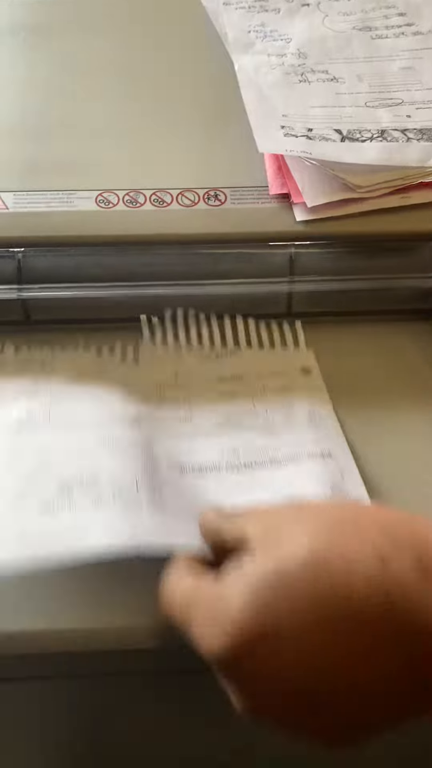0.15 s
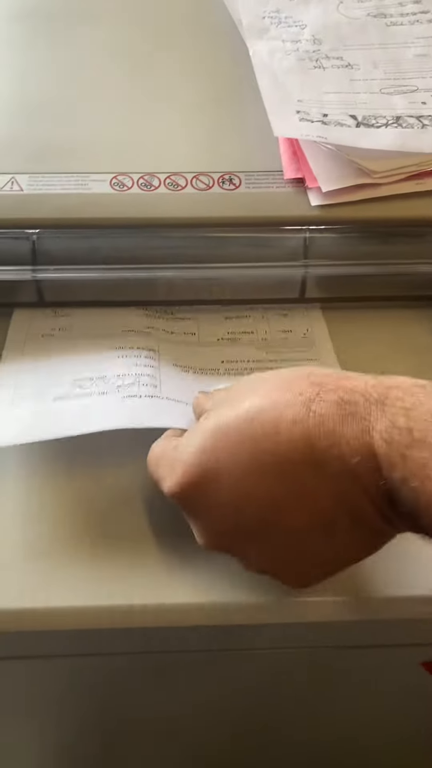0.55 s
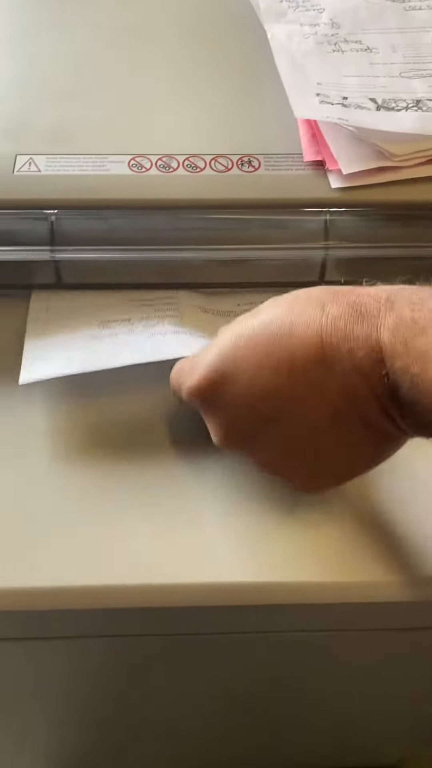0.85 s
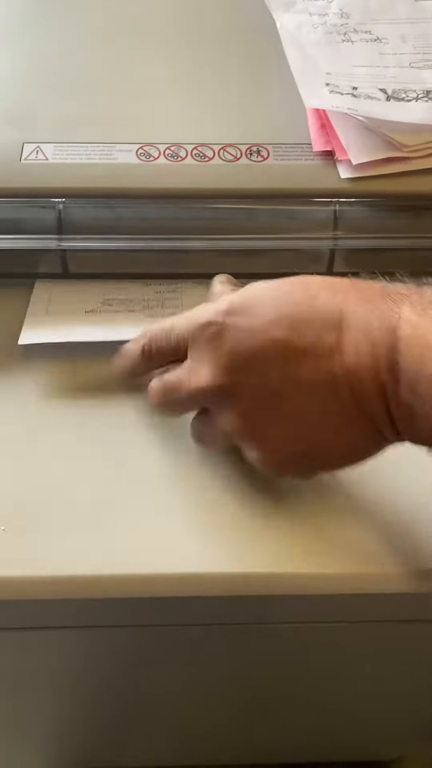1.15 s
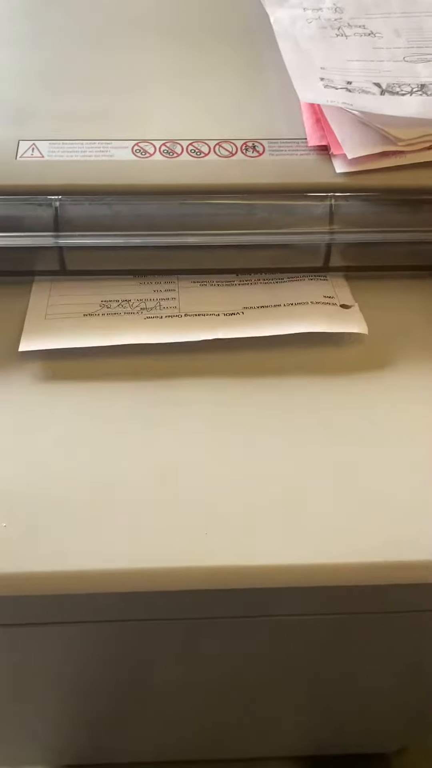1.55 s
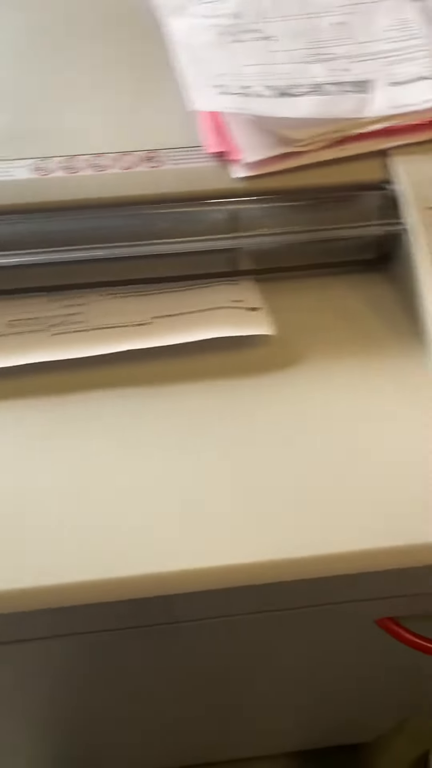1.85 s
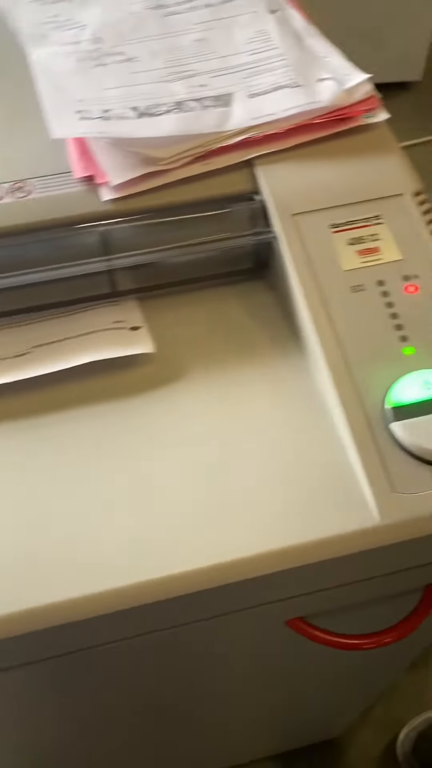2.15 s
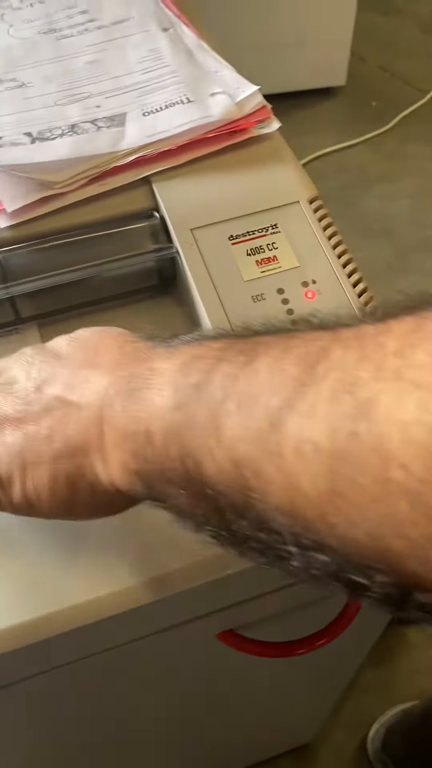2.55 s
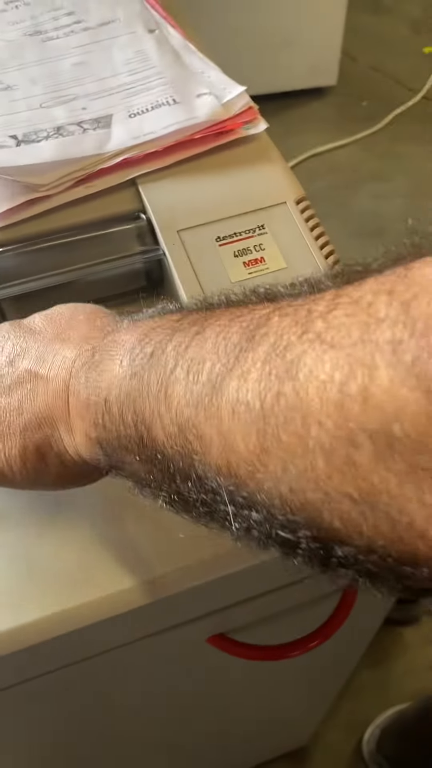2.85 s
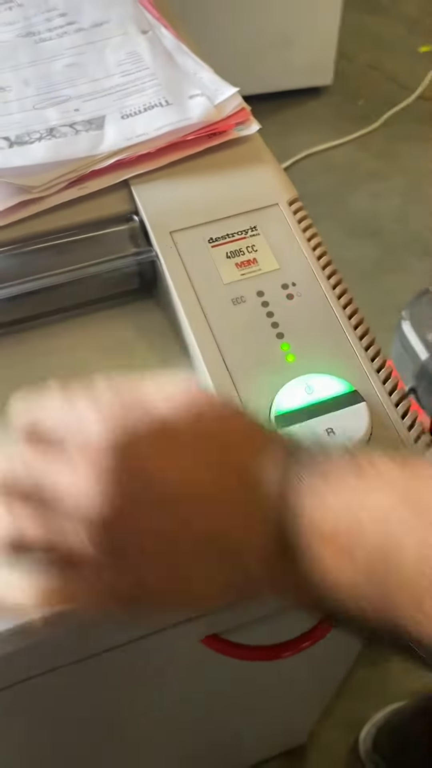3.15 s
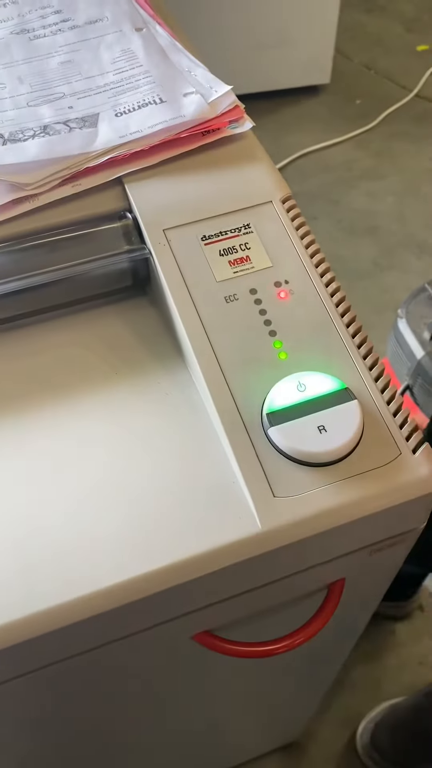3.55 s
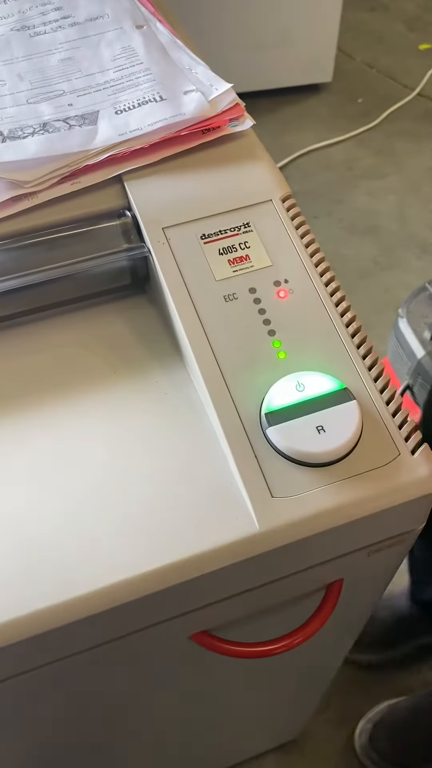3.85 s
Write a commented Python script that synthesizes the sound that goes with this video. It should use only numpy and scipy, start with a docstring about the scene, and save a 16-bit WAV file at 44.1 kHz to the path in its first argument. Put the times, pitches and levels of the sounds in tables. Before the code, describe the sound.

A paper shredder takes a rustling sheet, thumps into motion, hums and chews it with sharp crackling

```python
"""An office shredder starts up and chews a sheet of paper, held close to a hand-held microphone in a small room.
First the sheet hisses, crinkles and drums over the steel top into the slot: coloured random grains and noise.
A switch trips and the cabinet thumps (decaying modes); the motor settles to a mains hum with a gear whine.
A second later the cutters catch the sheet: tearing fibres crackle in bursts, with sharp snaps between.
Reflections come from under the lid and from the room; two microphone ports give the stereo."""
import sys
import numpy as np
from scipy import signal
from scipy.fft import rfft, irfft
from scipy.io import wavfile
from scipy.ndimage import uniform_filter1d

SR = 44100
rng = np.random.default_rng(int(sys.argv[2]) if len(sys.argv) > 2 else 0)


def digitize_waveform(pressure):
    """Quantize a signal to 16-bit integers and store it at the path in sys.argv[1].

    Rows of a 2-D input are taken as channels; values are limited to [-1, 1].
    """
    field = np.atleast_2d(pressure).T
    bounded = np.clip(field, -1, 1)
    quanta = np.round(bounded * 32767).astype(np.int16)
    wavfile.write(sys.argv[1], SR, quanta)


N = 176400
T = np.arange(N) / SR  # seconds


def amp(db):
    """Decibels to gain."""
    return 10 ** (np.asarray(db) / 20)


def unit(x):
    """Scales to rms 1."""
    return x / np.sqrt(np.mean(x ** 2) + 1e-20)


def read(points, hz):
    """Reads a table of (pitch_hz, value) on a log-frequency axis."""
    f, value = np.transpose(points)
    return np.interp(np.log(hz + 1), np.log(f + 1), value)


def level(points):
    """Gain along a (start_s, level_db) curve, practically silent outside it."""
    return amp(np.interp(T, *np.transpose(points), left=-150, right=-150))


def ramp(start, length):
    """Rises from 0 to 1 over length seconds."""
    return np.clip((T - start) / length, 0, 1)


def add(mix, s, sound):
    """Adds a sound at time s, cut off at the end of the mix."""
    part = mix[max(round(s * SR), 0):][:len(sound)]
    part += sound[:len(part)]


def colour(x, points, size=4096):
    """Causal minimum-phase filter of unit energy, so only the shape of the spectrum counts."""
    hz = abs(np.fft.fftfreq(size, 1 / SR))
    log_gain = np.log(amp(read(points, hz)))
    spectrum = np.exp(np.conj(signal.hilbert(log_gain)))
    taps = np.fft.ifft(spectrum).real[:size // 2]
    return signal.oaconvolve(x, taps / np.linalg.norm(taps))[:N]


def drift(rate_hz):
    """Slow random motion of rms 1: noise rolled off steeply above rate_hz."""
    hz = np.fft.rfftfreq(N, 1 / SR)
    slow = rfft(rng.standard_normal(N)) / (1 + (hz / rate_hz) ** 4)
    return unit(irfft(slow, N))


def grains(per_s, spread_db, top=3.36):
    """Random clicks of either sign, mostly small, a few large; rms 1."""
    size = amp(spread_db * np.minimum(rng.exponential(1, N), top))
    sign = rng.choice([-1, 1], N)
    present = rng.random(N) < per_s / SR
    return unit(size * sign * present)


def ring(modes, t):
    """Decaying sine modes after a blow."""
    return sum(amp(db - 60 * t / t60) * np.sin(2 * np.pi * hz * t) for hz, db, t60 in modes)


# loudness of the sliding sheet: start_s, level_db
SLIDE = [(0, -49), (.13, -48), (.19, -44), (.235, -45), (.27, -49), (.31, -51), (.35, -63), (.4, -63),
         (.455, -71), (.5, -59), (.525, -53), (.62, -49), (.68, -51), (.8, -60), (.93, -55), (1.015, -63),
         (1.04, -53), (1.078, -54), (1.1, -71), (1.15, -85)]
# spectrum of the paper hiss: pitch_hz, level_db (per Hz)
SLIDE_COLOUR = [(100, -56), (500, -27), (1100, 1.5), (1250, -4), (1480, -3), (1750, 1), (2150, 3.5),
                (4000, 0), (5500, -0.5), (8000, -8), (12000, -3.5), (16000, -27)]
CRINKLES_PER_S, CRINKLE_DB = 160, -7


def sliding_sheet():
    """Paper rubs on the tray: dense fluttering friction grains with sparser, more uneven crinkles."""
    friction = grains(7000, 2.4) * amp(1.7 * drift(45))
    crinkles = amp(CRINKLE_DB) * grains(CRINKLES_PER_S, 5.5)
    return unit(colour(friction + crinkles, SLIDE_COLOUR)) * level(SLIDE)


# loudness of the soft drumming as the sheet is pushed: start_s, level_db (before its swing)
DRUM = [(0, -65), (.2, -54), (.42, -66), (.55, -57.5), (.68, -51), (.82, -53.5), (.95, -51.5), (1.08, -48),
        (1.14, -54)]
# spectrum of the hollow tray: pitch_hz, level_db (per Hz)
DRUM_COLOUR = [(60, -27), (150, 2), (230, -1.5), (400, -7), (600, -12.5), (1500, -15.5), (6000, -60)]
DRUM_SWING_DB = 2.2  # rms


def drumming_tray():
    """The hollow tray drums under the pushed sheet: low noise with a restless level."""
    noise = colour(rng.standard_normal(N), DRUM_COLOUR)
    return noise * level(DRUM) * amp(DRUM_SWING_DB * drift(26))


# spectrum of the room background: pitch_hz, level_db (per Hz)
ROOM_COLOUR = [(20, -15), (55, 8), (90, 3.5), (140, -1), (250, -9.5), (430, -22.5), (650, -16.5),
               (1000, -22), (1700, -31.5), (2600, -31), (4000, -39.5), (8000, -48.5), (16000, -60)]
ROOM_DB = -49.5  # before a slow swing


def background():
    """Quiet, mostly low room noise whose level wanders slowly."""
    noise = colour(rng.standard_normal(N), ROOM_COLOUR)
    return amp(ROOM_DB) * noise * amp(1.6 * drift(3.3))


WET_DB, ROOM_T60_S = -13, 0.075


def room(x, t60, delay):
    """A diffuse decaying tail after a delay in seconds, different at each port and weak in the bass."""
    t = T[:SR // 2]
    tail = rng.standard_normal((2, len(t))) * amp(-60 * t / t60) * (t > delay)
    tail = signal.sosfilt(signal.butter(1, 1200, "high", fs=SR, output="sos"), tail)
    tail /= np.linalg.norm(tail, axis=1, keepdims=True)
    return signal.fftconvolve(x[None], tail, axes=1)[:, :N]


NEAR_T60_S, NEAR_DB = .02, -6.5


def lid(x, count=5, size=64):
    """Sound hops between places along the wide slot, each with its own reflections under the lid."""
    place = np.repeat(rng.integers(0, count, N // size + 1), size)[:N]
    shares = [uniform_filter1d((place == k) * 1., size) for k in range(count)]
    return sum(room(x * share, NEAR_T60_S, .0004) for share in shares)


# the sheet's edge knocks on the feed tray:
# start_s, level_db, pitch_hz (ring), width_hz (ring), length_s (time to fall 30 dB)
TAPS = [(.144, -32.5, 1550, 199, 0.046), (.19, -36, 1700, 900, 0.042), (.668, -41, 1030, 500, 0.061),
        (.91, -42.5, 1200, 600, 0.05), (1.036, -41, 1110, 800, 0.081), (1.485, -44, 2280, 940, 0.029)]
TAP_DRY, TAP_RISE_S = 0.21, 0.0054  # share of unresonant scuff, rise time


def knocks(rows):
    """Short noise scuffs, each ringing in one broad resonance."""
    out, t = np.zeros(N), T[:SR // 4]
    for s, db, hz, width, length in rows:
        scuff = rng.standard_normal(len(t))
        r = np.exp(-np.pi * width / SR)  # pole radius from the ring width
        body = signal.lfilter([1], [1, -2 * r * np.cos(2 * np.pi * hz / SR), r * r], scuff)
        envelope = amp(db - 30 * t / length) * np.minimum(t / TAP_RISE_S, 1)
        add(out, s, envelope * (unit(body) + TAP_DRY * scuff))
    return out


# air resonances of the feed slot: pitch_hz, level_db (before SLOT_DB), t60_s
SLOT = [(1260, -9, .045), (2128, 11, 0.075), (2536, 6.5, 0.1), (2765, 0.5, 0.064), (2894, -1, .05),
        (4800, -9, .025)]
SLOT_DB = -43.5


def slot(x):
    """The air in the feed slot rings along."""
    return amp(SLOT_DB) * signal.oaconvolve(x, ring(SLOT, T[:SR // 10]))[:N]


# snaps of the sheet, faint as it is fed in, loud between the cutters:
# start_s, crack_db, treble_db (both before SNAP_DB)
SNAPS = [(.144, -33, -42), (2.887, -31, -38), (3.063, -21, -28), (3.098, -21, -27), (3.198, -27, -27),
         (3.236, -23, -36), (3.294, -20, -26), (3.472, -14, -24), (3.527, -20, -30), (3.546, -21, -36),
         (3.593, -25, -28), (3.636, -23, -35), (3.681, -22, -36), (3.835, -21, -25)]
# spectrum of the crack: pitch_hz, level_db (per Hz, before the random tint)
SNAP_COLOUR = [(300, -20), (1200, -10.5), (1600, -8), (2100, 0), (2850, 7), (3700, 1), (5200, -0.5),
               (6500, -2), (8000, -25), (16000, -37)]
# spectrum of its treble: pitch_hz, level_db (per Hz, before the random tint)
SNAP_TREBLE = [(300, -40), (5000, -28), (7500, -5.5), (11500, 3), (13000, -8), (16000, -15.5)]
SNAP_DB, SNAP_TINT_DB = -1.0, 2.5  # trim, rms of the random tint
# decay constant, rise, and the length over which the level is reckoned
SNAP_DECAY_S, SNAP_RISE_S, SNAP_LENGTH_S = .0011, .0005, .005


def snaps():
    """Single sharp cracks of the sheet: very short noise bursts, each with a tint of its own."""
    out, t = np.zeros(N), T[:SR // 50]
    shape = np.minimum(t / SNAP_RISE_S, 1) * np.exp(-t / SNAP_DECAY_S)
    for s, crack_db, treble_db in SNAPS:
        for db, points in ((crack_db, SNAP_COLOUR), (treble_db, SNAP_TREBLE)):
            tinted = [(hz, value + SNAP_TINT_DB * rng.standard_normal()) for hz, value in points]
            burst = colour(shape * rng.standard_normal(len(t)), tinted)
            burst *= np.sqrt(SNAP_LENGTH_S * SR) / np.linalg.norm(burst)
            add(out, s, amp(db + SNAP_DB) * burst)
    return out + 0.26 * slot(out)


# blows on the cabinet from switch, contactor and drive:
# start_s, boom_db, clank_db, rattle_db (boom and clank add to the mode levels)
BLOWS = [(1.496, -42.5, -51, -72), (1.512, -39, -57, -56.5), (1.695, -39, -45, -45.5),
         (1.714, -36, -42, -72), (1.744, -29, -24.5, -37), (1.753, -29.5, -12, -23.5),
         (1.763, -19, -27, -37), (1.779, -28, -36, -41), (1.834, -30, -32, -59), (1.873, -37, -36, -55),
         (1.907, -30, -30.5, -58)]
# panel modes: pitch_hz, level_db (relative), t60_s
BOOM = [(191, 12, 0.096), (224.7, 4, 0.15), (258, 5, 0.09)]
# frame modes: pitch_hz, level_db (relative), t60_s
CLANK = [(398, -15, 0.33), (460, 1, 0.068), (505, -12, 0.045), (680, -12.5, 0.16), (800, -15, 0.09),
         (970, -22, 0.095), (1320, -22, 0.061), (2297, -17, 0.044)]
# spectrum of the loose parts: pitch_hz, level_db (per Hz)
RATTLE_COLOUR = [(100, -10), (600, 11.5), (1100, -2.5), (1600, 1.5), (2400, -4.5), (3300, -19), (5500, -13),
                 (9000, -21), (16000, -27)]
BOOM_RISE_S, CLANK_RISE_S, RATTLE_S = 0.0068, 0.0019, 0.024  # RATTLE_S is a decay constant


def cabinet():
    """Each blow booms in the panels, clanks in the frame and rattles loose parts."""
    out, rattle, t = np.zeros(N), np.zeros(N), T[:SR // 2]
    boom = np.minimum(t / BOOM_RISE_S, 1) * ring(BOOM, t)
    clank = np.minimum(t / CLANK_RISE_S, 1) * ring(CLANK, t)
    for s, boom_db, clank_db, rattle_db in BLOWS:
        add(out, s, amp(boom_db) * boom + amp(clank_db) * clank)
        add(rattle, s, amp(rattle_db) * np.exp(-t / RATTLE_S) * rng.standard_normal(len(t)))
    return out + colour(rattle, RATTLE_COLOUR)


# modes of the starting switch: pitch_hz, level_db, t60_s
SWITCH = [(1514, -37.5, 0.037)]
SWITCH_S = 1.694


def switch():
    """One small bright click: a ringing mode."""
    out = np.zeros(N)
    add(out, SWITCH_S, ring(SWITCH, T[:SR // 5]))
    return out


START_S, SPIN_UP_S = 1.76, 0.02  # motor start, time constant of the shaft speed
LOAD_S, LOAD_RISE_S = 2.64, 0.25  # the load comes on
SHAFT_HZ = 29.75  # at full speed
HUM_HZ, HUM_LAG_TURNS = 120, .58


def shaft_turns():
    """Time in seconds of full-speed running: the integral of a speed that settles at 1."""
    speed = 1 - np.exp(-np.maximum(T - START_S, 0) / SPIN_UP_S)
    return np.cumsum(speed) / SR


def partial(k, waver):
    """One wavering multiple of the hum; the cabinet delays the higher ones more."""
    flutter = 1 + waver * (drift(10.4) + 1j * drift(7.9))
    return (flutter * np.exp(2j * np.pi * (k * HUM_HZ * T - HUM_LAG_TURNS * k * k))).real


# multiples of the magnetic hum: multiple, idle_db, loaded_db (both rms), waver_share
HUM = [(1, -22.5, -24, 0.037), (3, -32.5, -37, 0.036), (4, -46.5, -50, 0.33), (6, -49.5, -50, 0.26)]
# the octave of the hum as it swells: start_s, level_db (rms)
OCTAVE = [(1.87, -34), (2.56, -31.5), (4.0, -31)]
OCTAVE_WAVER, HUM_START_S, HUM_RISE_S = 0.31, 1.87, 0.06


def mains_hum(load):
    """Magnetic hum: steady multiples of one pitch whose levels move with the load."""
    hum = level(OCTAVE) * partial(2, OCTAVE_WAVER)
    for k, idle_db, loaded_db, waver in HUM:
        hum += amp(idle_db + (loaded_db - idle_db) * load) * partial(k, waver)
    return np.sqrt(2) * hum * ramp(HUM_START_S, HUM_RISE_S)


# tones of shaft and gears: pitch_hz (full speed), level_db (rms), wobble_rad (with each shaft turn)
WHINE = [(773.7, -35.5, 0.27), (862, -54, 0.3), (888, -56.5, 0), (1015, -53.5, 0), (1451, -54.5, 0.66)]
WHINE_WAVER_DB = 1.2  # rms


def gear_whine(turns):
    """Gear tones that rise with the shaft, their phase wobbling once a turn."""
    whine = np.zeros(N)
    for hz, db, wobble in WHINE:
        phase = 2 * np.pi * (hz * turns + rng.random())
        phase += wobble * np.sin(2 * np.pi * SHAFT_HZ * turns) + 0.17 * drift(28)
        whine += amp(db + WHINE_WAVER_DB * drift(43)) * np.cos(phase)
    return np.sqrt(2) * whine * ramp(START_S + 0.053, 0.033)


# spectrum of the running drive: pitch_hz, level_db (per Hz)
DRIVE_COLOUR = [(25, -30), (40, -15), (56, 2.5), (80, -6), (130, -0.5), (205, 5.5), (250, -0.5),
                (300, -5.5), (420, -8), (600, -12), (780, -7.5), (1000, -17), (1250, -15), (1450, -15.5),
                (1650, -21), (2100, -21.5), (3500, -42), (8000, -41), (16000, -45)]
DRIVE_DB, DRIVE_LOAD_DB = -37.5, 3.5  # idle level before the throb, rise under load


def drive_rumble(turns, load):
    """Running noise of the drive, throbbing once per shaft turn and louder under load."""
    throb = 1 + 0.23 * np.cos(2 * np.pi * SHAFT_HZ * turns)
    noise = colour(rng.standard_normal(N) * throb, DRIVE_COLOUR)
    return noise * amp(DRIVE_DB + DRIVE_LOAD_DB * load)


# loudness of the shudder while the drive comes up to speed: start_s, level_db (before its swing)
SHUDDER = [(1.76, -42), (1.79, -33), (1.84, -32), (1.91, -34), (1.98, -39), (2.1, -57)]
# spectrum of that shudder: pitch_hz, level_db (per Hz)
SHUDDER_COLOUR = [(30, -29), (120, 12), (240, -1), (330, -11), (620, -10.5), (800, -2), (1000, -22),
                  (1800, -17.5), (3500, -37), (16000, -56)]
SHUDDER_SWING_DB = 2.0  # rms


def start_shudder():
    """The drive shudders as it starts: low noise that swells, flutters and dies away."""
    noise = colour(rng.standard_normal(N), SHUDDER_COLOUR)
    return noise * level(SHUDDER) * amp(SHUDDER_SWING_DB * drift(40))


def motor():
    """Hum, whine, rumble and starting shudder share one shaft and one load."""
    load, turns = ramp(LOAD_S, LOAD_RISE_S), shaft_turns()
    noise = drive_rumble(turns, load) + start_shudder()
    return mains_hum(load) + gear_whine(turns) + noise * ramp(START_S, 0.028)


LURCH_DB, LURCH_HZ, LURCH_S = -31.5, 47.5, .19  # peak level, pitch, length


def lurch():
    """The starting torque rocks the machine on its feet: one swell of a low tone."""
    swell = np.sin(np.pi * ramp(START_S, LURCH_S))
    return amp(LURCH_DB) * swell * np.sin(2 * np.pi * LURCH_HZ * T)


# loudness of the sheet's edge on the idle cutters: start_s, level_db (before a swing)
BRUSH = [(1.78, -87), (1.9, -55), (2.06, -48), (2.2, -48.5), (2.315, -47), (2.335, -41.5), (2.355, -48.5),
         (2.47, -46), (2.62, -50), (2.85, -45.5), (4, -39.5)]
# spectrum of that brushing: pitch_hz, level_db (per Hz)
BRUSH_COLOUR = [(300, -22), (1200, -4), (1800, 4.5), (2500, -6.5), (2950, 4), (3500, -4), (5200, -3),
                (7500, -17.5), (11000, -6), (16000, -20.5)]


def brushing_cutters():
    """The cutters brush the edge of the sheet: dense fluttering grains."""
    brush = colour(grains(7000, 3.5), BRUSH_COLOUR)
    return brush * level(BRUSH) * amp(1.3 * drift(50))


# the gears take up their slack in light clacks:
# start_s, level_db, pitch_hz (ring), width_hz (ring), length_s (time to fall 30 dB)
BACKLASH = [(1.805, -39, 1790, 400, 0.046)]


def gear_backlash():
    """Gear clacks, made as short resonant scuffs."""
    return knocks(BACKLASH)


FIBRES_PER_S, FIBRE_SPREAD_DB = 1500, 4.2
# each bite of a tooth starts a tear at once, which dies away with time constant BITE_S
BITES_PER_S, BITE_SPREAD_DB, BITE_S, BETWEEN_BITES = 170, 3.0, .004, .45


def tearing(size=1800):
    """Fibres break in short runs, one for each bite; the steady feed keeps their average even."""
    strikes = abs(grains(BITES_PER_S, BITE_SPREAD_DB))
    bites = signal.lfilter([1], [1, -np.exp(-1 / (BITE_S * SR))], strikes)
    breaks = grains(FIBRES_PER_S, FIBRE_SPREAD_DB) * (BETWEEN_BITES + unit(bites))
    return breaks / np.sqrt(uniform_filter1d(breaks ** 2, size) + 1e-9)


# loudness of the cutting: start_s, level_db (before CUT_DB)
CUT = [(2.7, -49), (3.024, -28), (4.0, -28.5)]
# spectrum of the cutter crackle: pitch_hz, level_db (per Hz)
CUT_COLOUR = [(150, -25), (600, -18.5), (900, -11), (1230, -5.5), (1600, -15), (2200, -1.5), (2500, -3),
              (2830, 4.5), (3300, -3), (4100, -10), (4900, -7.5), (7000, -17), (9500, -14.5), (11400, -13),
              (13000, -14.5), (16000, -32)]
# tints of fibres of three sizes, one curve each: pitch_hz, level_db
TINTS = [
    [(100, -4), (1500, -2.5), (3000, -18), (16000, -15.5)],
    [(100, -20), (1200, -13), (2800, -5), (4500, -4), (8000, -8.5)],
    [(100, -17), (3000, -6), (5500, 6.5), (16000, -1.5)],
]
# share of each tint in the crackle: level_db (relative)
TINT_DB = [-5, -5, -2.5]
CUT_DB = -0.5


def cutters():
    """Tearing fibres of three sizes crackle in the feed slot."""
    fibres = sum(amp(db) * colour(tearing(), tint) for tint, db in zip(TINTS, TINT_DB))
    crackle = unit(colour(fibres, CUT_COLOUR) + slot(fibres))
    return amp(CUT_DB) * crackle * level(CUT)


def scene():
    """Paper and machine close by, with reflections from the lid and from the room."""
    sheet = sliding_sheet() + drumming_tray() + brushing_cutters()
    paper = sheet + knocks(TAPS) + snaps() + cutters()
    machine = cabinet() + switch() + gear_backlash()
    near = amp(NEAR_DB) * lid(paper)
    far = amp(WET_DB) * room(paper + machine, ROOM_T60_S, 0.0045)
    return paper + machine + near + far + motor() + lurch() + background()


# phase between the two microphone ports: pitch_hz, lead_rad (left leads)
PORT_PHASE = [(200, 0), (400, .3), (780, .28), (1200, -.25), (2000, .1), (2600, 1.1), (3300, 1.5),
              (3850, 0), (4350, 1.1), (5100, .3), (6000, 1.6), (7300, 3.14), (10200, 6.2), (12000, 8),
              (13500, 9.4), (16000, 12.2)]
# balance of the two ports: pitch_hz, level_db (left minus right)
PORT_BALANCE = [(100, 0.14), (240, 0.9), (480, 4), (780, 5), (1120, 7), (1600, 2), (2100, 1.5),
                (2500, -1.5), (3400, 4.5), (4300, -0.5), (4950, 3), (5800, 2), (16000, -0.5)]
CUTOFF_HZ = 16000


def record(dry):
    """Phase and level differences of the two ports, half to each side, then the band limit."""
    hz = np.fft.rfftfreq(N, 1 / SR)
    half = amp(read(PORT_BALANCE, hz) / 2) * np.exp(.5j * read(PORT_PHASE, hz))
    ports = irfft(rfft(dry) * np.array([half, 1 / half]), N)
    low_pass = signal.firwin(511, CUTOFF_HZ, window=("kaiser", 9), fs=SR)
    return signal.oaconvolve(ports, low_pass[None], "same")


dry = scene()
out = record(dry)
digitize_waveform(out)
```